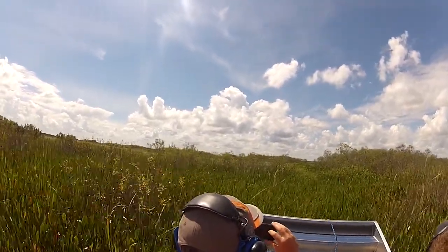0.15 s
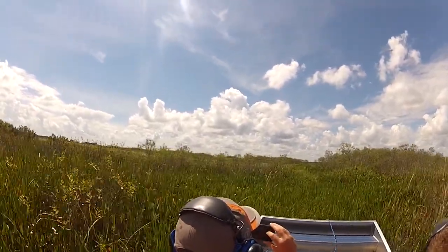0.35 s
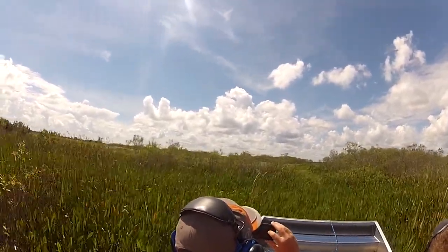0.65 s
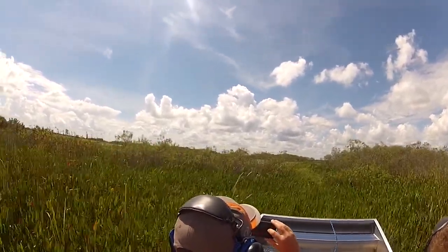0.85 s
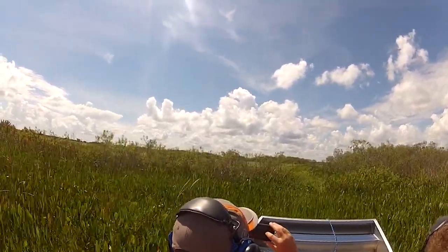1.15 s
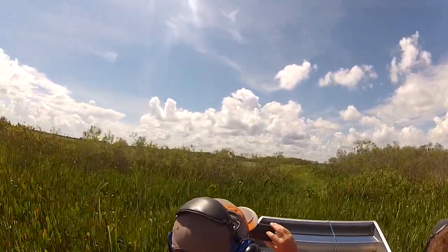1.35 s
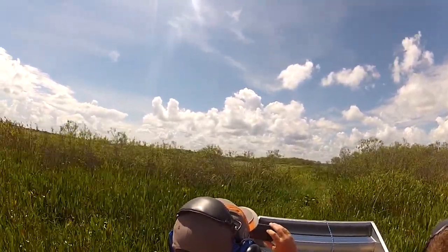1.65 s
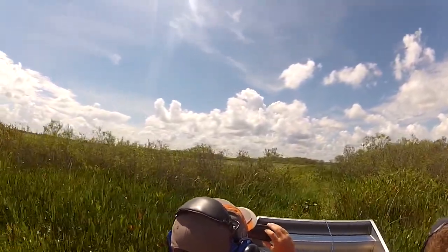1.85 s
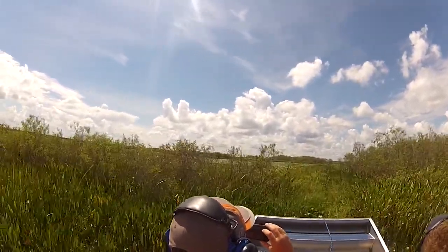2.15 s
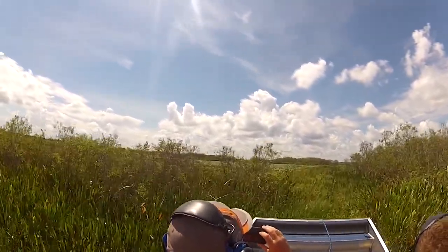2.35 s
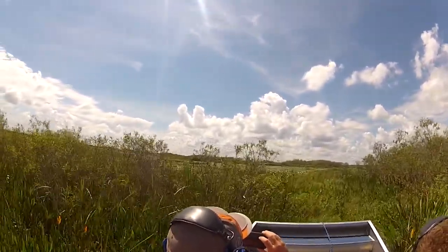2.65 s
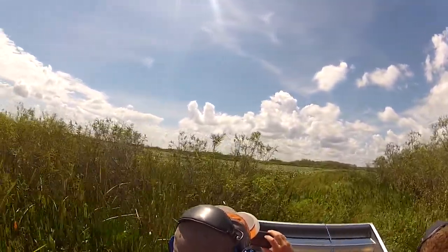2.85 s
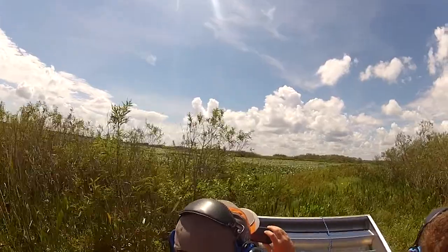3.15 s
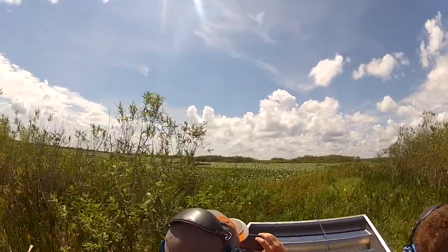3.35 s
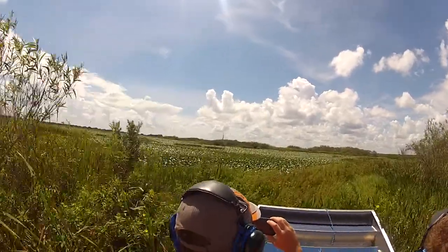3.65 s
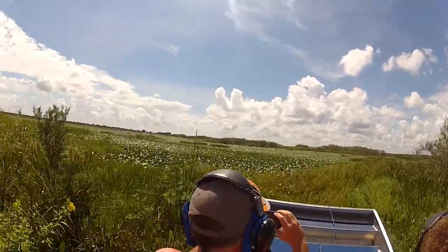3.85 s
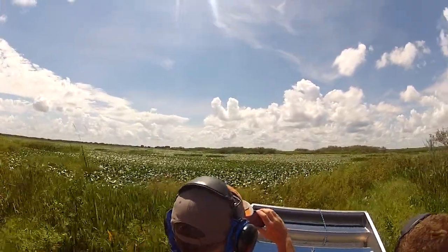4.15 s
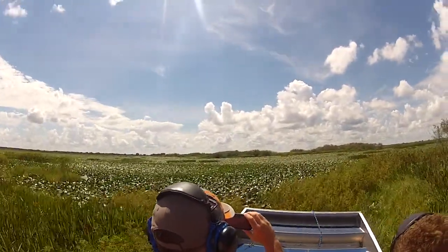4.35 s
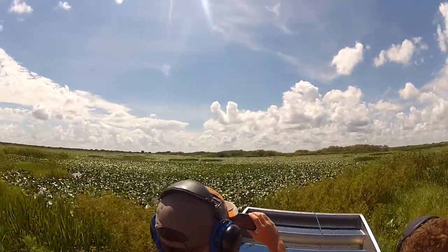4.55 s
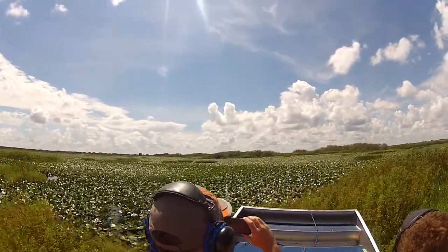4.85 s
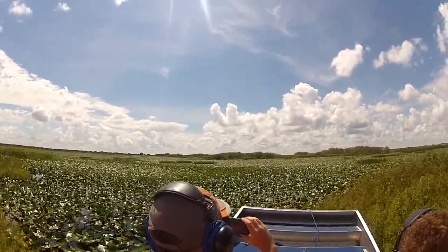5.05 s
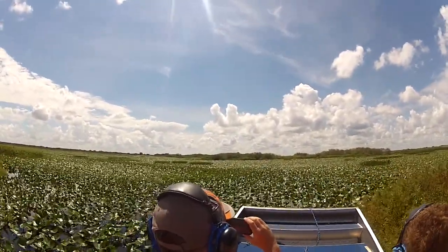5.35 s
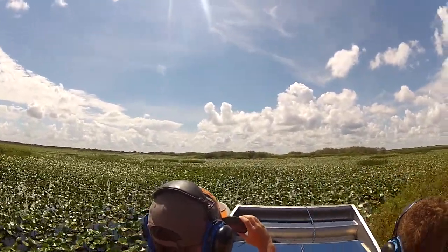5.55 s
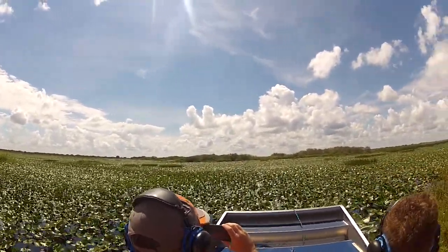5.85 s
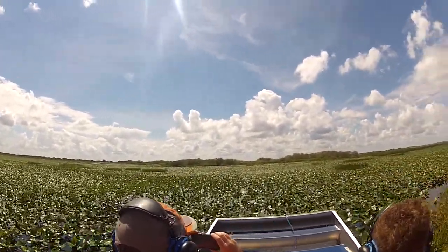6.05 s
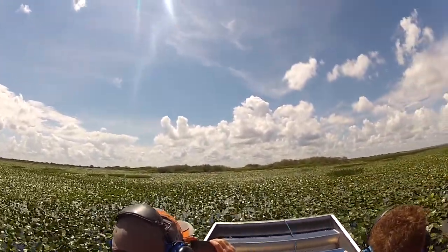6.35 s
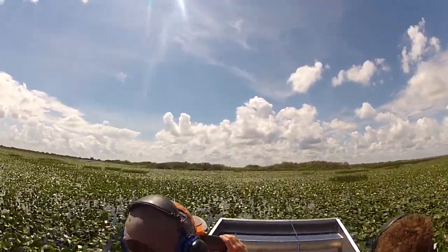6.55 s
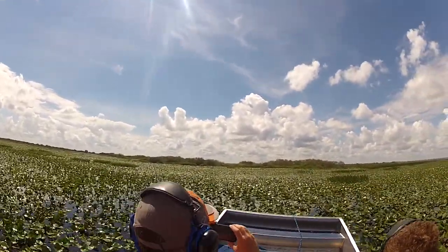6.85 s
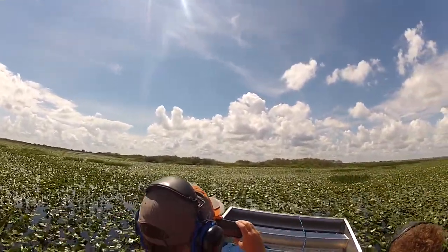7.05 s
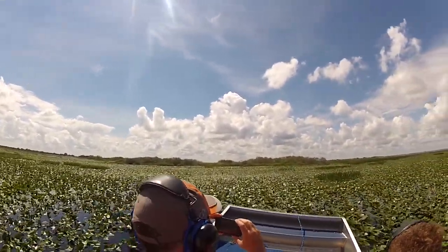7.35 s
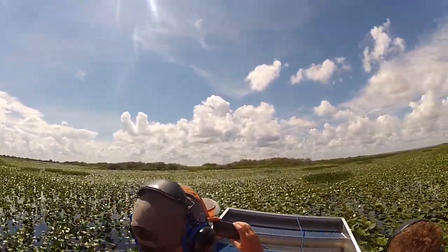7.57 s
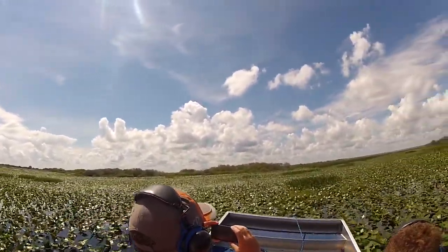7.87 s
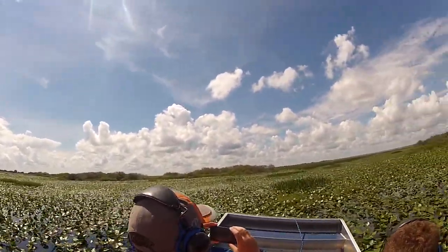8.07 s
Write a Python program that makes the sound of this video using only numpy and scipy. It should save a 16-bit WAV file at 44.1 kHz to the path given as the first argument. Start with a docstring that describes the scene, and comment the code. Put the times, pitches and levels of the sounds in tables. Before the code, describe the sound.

An airboat runs through marsh, heard very close from a passenger seat in mono. From 0 to 2.5 s it cruises: a low propeller drone near 77 Hz with buzzing overtones, slow beating against uneven exhaust tones, a faint gear whine, and broad roaring, hollow, raspy torn air fluttering with the blades. From about 2.5 s the throttle opens; pitch and loudness climb, fastest after 3.3 s, to a heavy, hard-edged roar near 97 Hz at 4 s. It then eases, still strong until 5 s, sliding down more quickly to a softer, lower throb near 66 Hz around 6.6 s. At 6.5 s a tiny soft stalk swish brushes the hull, barely above the machine. From 6.7 s the drone climbs back, nearly at cruise by 8 s. A thin, gritty treble sizzle follows everything throughout.

```python
"""An airboat runs through marsh grass, heard from a passenger seat.
A geared propeller drones at a steady pace, beating against the exhaust tones, in a roar and rasp of torn air.
From about 2.5 s the throttle opens and all grows louder up to 4 s; then it eases off until 6.6 s.
Near 6.5 s a stalk swishes on the hull, and the throttle then comes back.
Throughout, a slow sample-and-hold mirrors the sound into a thin treble sizzle."""
import sys
import numpy as np
from scipy import signal
from scipy.fft import rfft, irfft, next_fast_len
from scipy.io import wavfile
from scipy.ndimage import uniform_filter1d, map_coordinates

SR = 44100
rng = np.random.default_rng(int(sys.argv[2]) if len(sys.argv) > 2 else 0)


def inscribe(sig):
    """Save sig as 16-bit PCM at rate SR to the path in sys.argv[1].

    A 1-D sig is mono; a 2-D sig holds one channel per row.
    Samples are clipped to [-1, 1] before scaling.
    """
    pcm = np.round(np.clip(np.atleast_2d(sig).T, -1, 1) * 32767)
    wavfile.write(sys.argv[1], SR, pcm.astype(np.int16))


N = 362061  # length [samples]
CRUISE_HZ = 77  # blade rate at cruising speed [Hz]


def amp(db):
    """Level law: decibels to amplitude gain."""
    return 10 ** (np.asarray(db) / 20)


def unit(x):
    """Normalisation: x at rms 1."""
    return x / np.sqrt(np.mean(x ** 2) + 1e-20)


def along(points, hz):
    """Spectral envelope: (frequency [Hz], level [dB]) points read on a log frequency axis."""
    point_hz, db = np.transpose(points)
    return np.interp(np.log(hz + 1), np.log(point_hz), db)


def wobble(rate):
    """Random modulation: a smooth curve through normal random knots, rate knots a second."""
    knots = rng.standard_normal(int(N * rate / SR) + 4)
    coarse = np.arange(0, N + 32, 32)  # the spline is read every 32 samples
    return np.interp(np.arange(N), coarse, map_coordinates(knots, [coarse * rate / SR]))


def filtered(x, response):
    """Linear filtering: the spectrum of x times a response of frequency."""
    padded = next_fast_len(N + SR // 4)
    hz = np.fft.rfftfreq(padded, 1 / SR)
    return irfft(rfft(x, padded) * response(hz), padded)[:N]


def noise(spectrum):
    """Coloured noise: white noise shaped by (frequency [Hz], level [dB]) points, at rms 1."""
    return unit(filtered(rng.standard_normal(N), lambda hz: amp(along(spectrum, hz))))


def ringing(modes):
    """Resonance: noise of rms 1 in steep-sided peaks."""
    def peaks(hz):
        return sum(amp(db) / (1 + ((hz - centre) / (width * 2 / 3)) ** 2) for centre, width, db in modes)

    return unit(filtered(rng.standard_normal(N), peaks))


def tone(phase, rough, rate):
    """Narrow-band tone near rms 1: strength and phase stray by the share rough, rate times a second."""
    in_phase = (1 + rough * wobble(rate)) * np.cos(phase)
    quadrature = rough * wobble(rate) * np.sin(phase)
    return (in_phase + quadrature) * np.sqrt(2 / (1 + 2 * rough ** 2))


def swell(speed, level_db, swell_db, best_hz, width_hz):
    """Resonant gain: a tone's level rises as the blade rate passes its best value."""
    return amp(level_db + swell_db * np.exp(-((speed - best_hz) / width_hz) ** 2))


# drone growing with speed: (blade rate [Hz], first harmonic level [dB], second harmonic level [dB])
DRONE_LEVELS = [(66, -27.7, -22), (75.5, -24, -21.6), (78.8, -21.3, -17.5), (84.2, -16, -19),
                (91.7, -12.5, -7), (96.7, -12, -6)]
# overtones of the blade rate: (multiple of the blade rate, level [dB] added to the hull's response)
BLADE_OVERTONES = [(3, 0), (4, 0.5), (5, 0.5), (6, 4), (7, 2.5), (8, 2), (9, -1), (10, 1), (11, 1.5),
                   (12, -.5), (13, -2)]
# cage and hull response that the overtones glide through: (frequency [Hz], level at cruise [dB])
HULL_RESPONSE = [(200, -23), (235, -43), (270, -32), (305, -43.5), (350, -37.8), (420, -54), (470, -43.5),
                 (560, -45), (600, -51), (660, -45), (780, -54.5), (920, -52), (990, -48), (1070, -39),
                 (1130, -44), (1250, -78)]
# flutter of the unequal blades: (multiple of the shaft rate, level at cruise [dB])
SHAFT_FLUTTER = [(2, -52), (4, -47), (5, -54)]
BLADE_COUNT = 3
BUZZ_POWER = 3.5  # overtone and flutter amplitude grows as this power of the speed


def propeller(phase, speed):
    """Blade-passing harmonics: a two-tone drone, hull-coloured overtones in gusty inflow, and shaft flutter."""
    rates, first_levels, second_levels = np.transpose(DRONE_LEVELS)
    first = amp(np.interp(speed, rates, first_levels)) * tone(phase, rough=.035, rate=11)
    second = amp(np.interp(speed, rates, second_levels)) * tone(2 * phase, rough=.03, rate=10)
    buzz = np.zeros(N)
    for k, db in BLADE_OVERTONES:
        start = rng.uniform(0, 2 * np.pi)
        # higher overtones stray more
        overtone = tone(k * phase + start, rough=.03 * k, rate=8)
        buzz += amp(db + along(HULL_RESPONSE, k * speed)) * overtone
    flutter = sum(amp(db) * tone(k * phase / BLADE_COUNT, rough=.46, rate=3.9) for k, db in SHAFT_FLUTTER)
    return first + second + (buzz + flutter) * (speed / CRUISE_HZ) ** BUZZ_POWER


# exhaust tones, swelling around the speed that suits the pipes and barking as the throttle opens:
# (multiple of the engine cycle, level [dB], swell [dB], best blade rate [Hz], swell width [Hz], bark [dB])
EXHAUST_TONES = [(5, -41, 13.5, 79, 27, 1.5), (6, -43.5, 18.5, 82.3, 12.3, 1.8),
                 (8, -32.5, 4, 81.9, 3.8, 2.5), (9, -44, 9.5, 75.4, 1.16, 4), (10, -52, 20, 89.4, 12.6, .4),
                 (11, -50, 15.5, 71.1, 8, 4.5)]
# weak tones of the unequal cylinders: (multiple of the engine cycle, level at cruise [dB])
CYLINDER_TONES = [(2, -43), (3, -44), (4, -45), (7, -50), (12, -47.5), (13, -55.5), (14, -55), (16, -51),
                  (18, -54.5), (24, -52.5), (32, -62)]
# gear whine, singing out at two speeds: (level [dB], swell [dB], best blade rate [Hz], swell width [Hz])
WHINE_SWELLS = [(-52, 11.5, 66.2, .7), (-47.5, 7.5, 83.6, 2.7)]
GEAR_ORDER = 96  # tooth meshes per engine cycle
UNEVEN_FIRING = .11  # share by which the exhaust tones falter
CYLINDER_POWER = 1.6  # cylinder tone amplitude grows as this power of the speed


def engine(cycle, speed, throttle):
    """Four-stroke orders: exhaust tones and gear mesh; the fifth order beats with the second blade harmonic."""
    exhaust = np.zeros(N)
    for k, level_db, swell_db, best_hz, width_hz, bark_db in EXHAUST_TONES:
        gain = swell(speed, level_db, swell_db, best_hz, width_hz) * amp(bark_db * throttle)
        exhaust += gain * tone(k * cycle, rough=UNEVEN_FIRING, rate=12)
    cylinders = np.zeros(N)
    for k, db in CYLINDER_TONES:
        start = rng.uniform(0, 2 * np.pi)
        cylinders += amp(db) * tone(k * cycle + start, rough=.39, rate=7.7)
    whine_gain = np.max([swell(speed, *row) for row in WHINE_SWELLS], axis=0)
    whine = whine_gain * tone(GEAR_ORDER * cycle, rough=.72, rate=30)
    return exhaust + cylinders * (speed / CRUISE_HZ) ** CYLINDER_POWER + whine


# turbulence behind the blades: (frequency [Hz], relative density [dB per Hz])
ROAR_SPECTRUM = [(20, -12), (42, -12), (62, -4), (100, -7), (185, -.5), (260, -6), (380, -9.5),
                 (480, -12.5), (630, -10.5), (770, -17.5), (950, -12), (1250, -28.5), (1750, -22.5),
                 (2500, -65)]
# hollow resonances that the roar rings: (centre [Hz], width [Hz], relative level [dB])
HOLLOW_MODES = [(1104, 58, -1), (1429, 145, -14), (2683, 60, -10)]
# hiss of the blade tips, its colour shared by the stalks: (frequency [Hz], relative density [dB per Hz])
RASP_SPECTRUM = [(1300, -62), (1760, -24), (1910, 1), (2060, -4), (2200, 1.5), (2450, -4.5), (2950, -5),
                 (3350, -12), (3700, -12), (4030, -16.5), (4230, -14), (4500, -16), (5300, -14.5),
                 (6000, -21)]
ROAR_DB, HOLLOW_DB, RASP_DB = -31, -37.5, -32  # levels at cruise, before thrust [dB]
ROAR_POWER, HOLLOW_POWER, RASP_POWER = 2.65, 3.14, 3.29  # amplitude grows as these powers of the speed
THRUST_DB = .5  # extra level as the blades work to speed the boat up, open throttle [dB]


def air(phase, speed, throttle):
    """Turbulence noise: torn air roars and rings hollowly; the tip hiss swells at each blade pass."""
    pace = speed / CRUISE_HZ
    roar = amp(ROAR_DB + .73 * wobble(12)) * pace ** ROAR_POWER * noise(ROAR_SPECTRUM)
    hollow = amp(HOLLOW_DB + .28 * wobble(12)) * pace ** HOLLOW_POWER * ringing(HOLLOW_MODES)
    chop = 1 + .13 * np.cos(phase) + .026 * np.cos(2 * phase)
    rasp_gain = amp(RASP_DB + .13 * wobble(15) + .43 * wobble(150)) * pace ** RASP_POWER
    rasp = rasp_gain * chop * noise(RASP_SPECTRUM)
    return amp(THRUST_DB * throttle) * (roar + hollow + rasp)


# stalks brushing the hull: (time [s], level [dB])
STALK_BRUSHES = [(6.516, -32)]


def stalks():
    """Friction noise: a passing stalk brushes the hull with a short, soft swish."""
    t = np.arange(N) / SR
    envelope = np.zeros(N)
    for start, db in STALK_BRUSHES:
        age = np.maximum(t - start, 0) / .007  # the swish peaks after 7 ms
        envelope += amp(db) * age * np.exp(1 - age)
    return envelope * noise(RASP_SPECTRUM)


# propeller speed: (time [s], blade rate [Hz])
PROPELLER_SPEED = [(0, 78.47), (0.65, 78.22), (1.25, 76.79), (2.45, 77.08), (2.9, 81.37), (3.3, 84.8),
                   (3.8, 95.0), (4, 97.19), (4.2, 94.44), (4.7, 91.14), (4.9, 88.26), (5.35, 83.13),
                   (5.65, 74.93), (6.1, 69.27), (6.4, 66.86), (6.65, 66.28), (6.9, 67.44), (7.5, 74.5),
                   (8.21, 76.85)]


def propeller_speed():
    """Kinematics: the blade rate over time [Hz], in straight lines between the points."""
    times, rates = np.transpose(PROPELLER_SPEED)
    return np.interp(np.arange(N) / SR, times, rates)


CYCLES_PER_BLADE = .38178  # gearing: engine cycles per blade pass
CRANK_START = .845  # the crank's place at the start [cycles]
THROTTLE_HZ_PER_S = 2.8  # climb of the blade rate that reads as a well-opened throttle [Hz/s]


def scene():
    """Geared coupling: one shaft speed turns the propeller, times the engine and implies the throttle."""
    speed = propeller_speed()
    climb = uniform_filter1d(np.gradient(speed) * SR, size=SR // 3)
    throttle = np.tanh(climb / THROTTLE_HZ_PER_S)  # 1 opening, 0 steady, -1 easing off
    phase = 2 * np.pi * np.cumsum(speed) / SR
    cycle = CYCLES_PER_BLADE * phase + 2 * np.pi * CRANK_START
    machine = propeller(phase, speed) + engine(cycle, speed, throttle)
    return (machine + air(phase, speed, throttle) + stalks())[None]


MIC_LOW_HZ, HOLD_HZ, TOP_HZ = 24, 12000, 15300  # bass corner, sampling rate, upper band limit [Hz]


def record(dry):
    """Zero-order hold: bass is shed, each slow sample is held, mirroring sound into the treble; peaks clip."""
    def bass_cut(hz):
        return 1j * hz / (1j * hz + MIC_LOW_HZ)

    def anti_alias(hz):
        # a ramp ending just above half the slow rate
        return np.clip((HOLD_HZ / 2 + 320 - hz) / 950, 0, 1)

    narrow = filtered(dry[0], lambda hz: bass_cut(hz) * anti_alias(hz))
    seconds = int(np.ceil(N / SR))
    slow = signal.resample(np.pad(narrow, (0, seconds * SR - N)), seconds * HOLD_HZ)
    steps = np.repeat(slow, 4)
    held = signal.resample_poly(steps, SR, 4 * HOLD_HZ)[:N]
    return filtered(np.clip(held, -1, 1), lambda hz: hz < TOP_HZ)[None]


dry = scene()
out = record(dry)
inscribe(out)
```